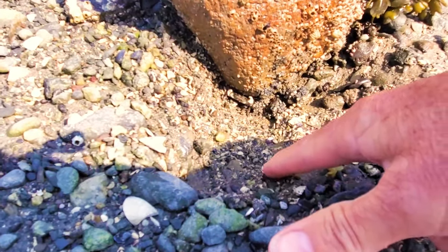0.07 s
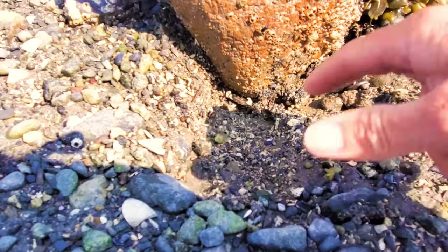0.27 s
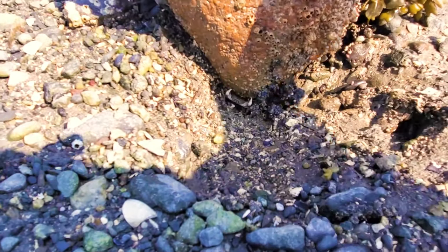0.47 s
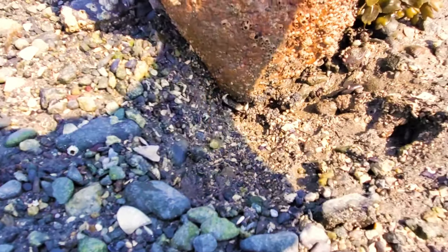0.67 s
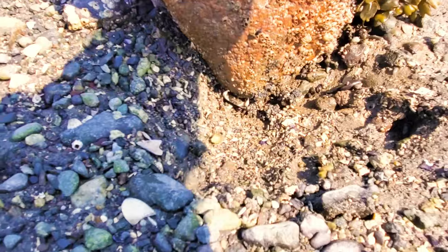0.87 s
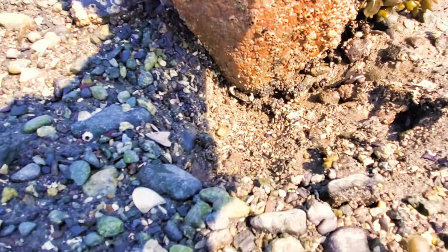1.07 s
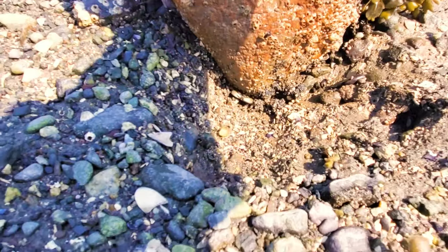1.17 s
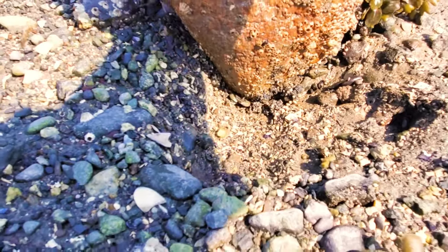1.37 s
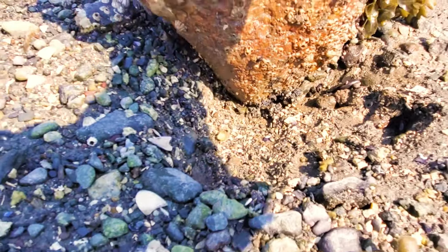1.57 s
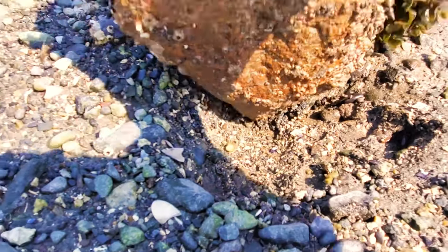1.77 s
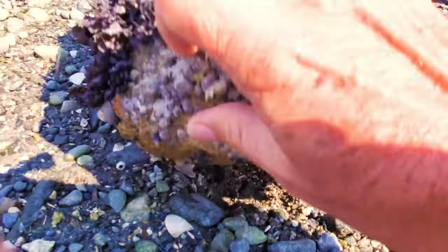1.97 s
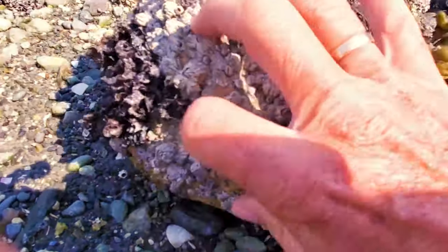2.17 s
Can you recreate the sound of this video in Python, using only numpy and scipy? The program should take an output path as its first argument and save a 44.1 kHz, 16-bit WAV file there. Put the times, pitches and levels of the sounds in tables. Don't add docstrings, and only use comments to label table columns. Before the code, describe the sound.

Gritty crunch of a stone pulled from beach gravel, shells snapping, then dull pebble knocks

```python
import sys
import numpy as np
from scipy import signal
from scipy.fft import rfft, irfft, next_fast_len
from scipy.io import wavfile
from scipy.ndimage import uniform_filter1d, map_coordinates

SR = 44100
rng = np.random.default_rng(int(sys.argv[2]) if len(sys.argv) > 2 else 0)


def materialize(psi):
    bounded = np.clip(np.atleast_2d(psi).T, -1, 1)
    quanta = np.round(bounded * 32767).astype(np.int16)
    wavfile.write(sys.argv[1], SR, quanta)


def decibels_to_gain(level_db):
    exponent = np.asarray(level_db, float) / 20
    return 10 ** exponent


N = 97549


def unit(x):
    return x / np.sqrt(np.mean(x ** 2) + 1e-20)


def along(points, hz):
    f, v = np.transpose(points)
    return np.interp(np.log(hz + 1), np.log(f + 1), v)


def curves(rows):
    s, *cols = np.transpose(rows)
    return [np.interp(np.arange(N) / SR, s, c) for c in cols]


def wobble(rate):
    knots = rng.standard_normal(int(N * rate / SR) + 4)
    return map_coordinates(knots, [np.arange(N) * rate / SR])


def filtered(x, response):
    m = next_fast_len(N + SR // 2)
    return irfft(rfft(x, m) * response(np.fft.rfftfreq(m, 1 / SR)), m)[..., :N]


def rush(gain, alike):
    def mid_side(hz):
        turn = np.arccos(np.clip(along(alike, hz), -1, 1)) / 2
        return gain(hz) * [np.cos(turn), np.sin(turn)]

    mid, side = filtered(rng.standard_normal((2, N)), mid_side)
    return unit(np.array([mid + side, mid - side]))


def patchy(pair, depth_db):
    z = signal.stft(pair, nperseg=256)[2]
    field = uniform_filter1d(rng.standard_normal(z.shape[1:]), size=4, axis=0)
    field = uniform_filter1d(field, size=8, axis=1)
    return unit(signal.istft(z * decibels_to_gain(depth_db * unit(field)), nperseg=256)[1][:, :N])


def sides(db):
    return decibels_to_gain(np.multiply.outer([.5, -.5], db))


def rings(s, hz, life_s, gains, size):
    t = np.arange(size) / SR
    wave = np.sin(2 * np.pi * np.minimum(hz, SR / 2.5)[:, None] * t) * np.exp(-t / life_s[:, None])
    at = ((s * SR).astype(int)[:, None] + np.arange(size)).ravel()
    return np.array([np.bincount(at, (g[:, None] * wave).ravel(), N + SR)[:N] for g in gains])


def grit():
    per_s, middle_hz, spread, cycles = 2200, 5120, 0.6, 0.9
    count = int(per_s * N / SR)
    u, g = rng.random((count, 2)), rng.standard_normal((count, 2))
    hz = middle_hz * np.exp(spread * g[:, 0])
    size_db = -np.log(u[:, 1] + 0.017)
    sizes = decibels_to_gain(size_db) * sides(np.clip(10 * g[:, 1], -12, 12))
    return unit(rings(u[:, 0] * N / SR, hz, cycles / hz, sizes, size=128)) * decibels_to_gain(3)


# centre in Hz, width in Hz, level in dB.
STONE_MODES = [(620, 1370, -3), (1000, 750, 3), (1900, 290, -5.5)]


def stone(weight_db):
    lumps_per_s, size_db = 300, 5

    def body(f):
        return sum((-1) ** k * decibels_to_gain(db) * 1j * f * w / (c * c - f * f + 1j * f * w)
                   for k, (c, w, db) in enumerate(STONE_MODES))

    lumps = (rng.random(N) < lumps_per_s / SR) * decibels_to_gain(size_db * np.minimum(rng.exponential(size=N), 3))
    lumps = lumps * rng.choice([-1, 1], N)
    bumps = unit(filtered(lumps, body)) * decibels_to_gain(-3.5)
    rubbed = unit(bumps + rush(body, GRIT_ALIKE)) * decibels_to_gain(weight_db)
    return filtered(rubbed, lambda f: (1j * f / (420 + 1j * f)) ** 2)


# start in seconds, effort in dB, weight of the stone in dB,
# brightness in dB, left over right in dB.
DRAG = [(0.975, -60, -15, -4, 2), (1.056, -49.5, -3, -1, 4.5), (1.192, -49, -6.5, -3, 4.5),
        (1.3, -54, -9, 1, 5), (1.43, -57.5, -7, 5.5, 4), (1.49, -52, -12, 4, 6.5),
        (1.57, -51.5, -10, 1, 5.5), (1.7, -42.5, -15.5, -1.5, 5), (1.784, -33.5, -10.5, 1.5, -1.5),
        (1.875, -31, -15, -5.5, 3.5), (1.944, -32.5, -5, -1, 8), (1.972, -41.5, 2, 6, 7),
        (2.004, -51.5, 5.5, 13.5, 11), (2.06, -32, 1, -9, 4), (2.094, -41, -4.5, -3, 9),
        (2.142, -43.5, -1.5, 0, 11.5), (2.17, -52, -4.5, 0, 5), (2.21, -44, 5.5, -1.5, 7.5)]
# start in seconds, level in dB.
SHUFFLE = [
    (0, -70.5),
    (.07, -90),
    (.3, -96),
    (.37, -72.5),
    (.46, -79),
    (.54, -92),
]
# frequency in Hz, level in dB per Hz.
SAND = [(880, -27), (1500, -9), (2200, -14), (2460, -8.5), (4280, -7), (4650, -15.5), (5250, -9),
        (9000, -32), (11700, -109), (19800, -120)]
# frequency in Hz, level in dB per Hz.
DUST = [(3500, -90), (6000, 1), (7500, -1), (12000, -1), (15800, -5)]
# frequency in Hz, likeness 0 to 1.
GRIT_ALIKE = [(500, 1), (2000, 0.77), (5000, 0.11), (12000, 0.04)]


def drag():
    effort_db, weight_db, bright_db, side_db = curves(DRAG)
    stir_db, = curves(SHUFFLE)
    before_pull_s = np.clip(DRAG[0][0] - np.arange(N) / SR, 0, 1)
    gain = decibels_to_gain(effort_db - 300 * before_pull_s) + decibels_to_gain(stir_db)
    shiver_db = 1.96 * wobble(30.23) + 0.46 * wobble(150)

    sand = patchy(rush(lambda hz: decibels_to_gain(along(SAND, hz)), GRIT_ALIKE), depth_db=0.5)
    sand = sand * decibels_to_gain(shiver_db + 2.0 * wobble(60))
    dust = patchy(rush(lambda hz: decibels_to_gain(along(DUST, hz)), GRIT_ALIKE), depth_db=1.2)
    dust = dust * decibels_to_gain(shiver_db + bright_db + 1.5 * wobble(250))
    crisp = filtered(sand + grit(), lambda f: (1j * f / (1456 + 1j * f)) ** 3)
    moved = gain * (crisp * sides(side_db) + dust * sides(0.46 * side_db) + stone(weight_db))

    dip_hz, dip_width_hz, dip_db = 1550, 180, -6
    return filtered(moved, lambda f: decibels_to_gain(dip_db * np.exp(-((f - dip_hz) / dip_width_hz) ** 2)))


def snaps(rows, ring_s, crack_db, tone_db):
    crack_s, width, late_s, tone_cycles = 0.0035, 0.28, 0.001, 31
    out, t = np.zeros((2, N + SR)), np.arange(1024) / SR
    f = np.fft.rfftfreq(2048, 1 / SR)
    for s, db, hz, side_db in rows:
        a, b, c = rng.standard_normal((3, len(t)))
        noise = np.array([a + 0.84 * b, a + 1.02 * c])
        fade = decibels_to_gain(-60 * t / ring_s) + decibels_to_gain(crack_db - 60 * t / crack_s)
        shape = fade * (1 - np.exp(-t / 0.0001))
        damping = 1j * f * hz * width * 2
        band = (damping / (hz * hz - f * f + damping)) ** 2
        burst = irfft(rfft(shape * noise, 2048) * band)[:, :len(t)]

        tone = decibels_to_gain(tone_db - 60 * t * hz / tone_cycles) * np.sin(2 * np.pi * hz * t)
        burst = burst / np.abs(burst).max() + tone * (1 - np.exp(-t / 0.00025))
        burst = burst / np.abs(burst).max() * 2
        start = round((s + late_s) * SR)
        out[:, start:start + len(t)] += decibels_to_gain(db - 4) * sides(side_db)[:, None] * burst
    return out[:, :N]


# start in seconds, peak in dB, pitch in Hz, left over right in dB.
SNAPS = [(0.0244, -40, 5400, 7.5), (0.168, -33.5, 5600, 5), (0.168, -39, 7060, 4), (0.168, -46, 9200, 6),
         (0.168, -49, 2520, 1), (0.3324, -58.5, 3600, 9), (0.4548, -45, 3230, 5.5),
         (0.4552, -45.5, 5450, -1), (0.585, -60.5, 3580, -6), (1.1092, -35.5, 2980, -2),
         (1.1672, -38, 2980, 12), (1.1872, -39, 3100, 4), (1.2, -34.5, 4300, -5), (1.3153, -32, 5100, 7),
         (1.3153, -32, 8100, 5), (1.319, -42, 11000, 3), (1.3757, -36, 3550, 5), (1.3917, -38.5, 3620, 5),
         (1.4112, -40, 3540, 8), (1.4485, -37, 7100, 0), (1.4582, -38, 6550, 3.5), (1.4834, -34, 4640, 5),
         (1.506, -31.5, 7440, 5), (1.5245, -37, 11900, 0), (1.528, -35.5, 5500, 4), (1.5375, -41, 11900, 3),
         (1.5977, -29, 7000, 7), (1.608, -32, 11100, -1), (1.6155, -36, 4500, 10), (1.669, -39, 3000, 1),
         (0.0454, -52, 9360, 6), (0.1905, -55, 6000, -3), (0.2508, -54, 10600, -3), (0.385, -52, 11500, 3),
         (1.333, -38, 7000, 4), (1.3714, -42, 13000, 0), (1.576, -32, 7000, 4.0), (1.581, -31, 10400, 7),
         (1.6383, -29, 10100, 10), (1.6563, -22.5, 13300, -7), (1.689, -25, 10900, 2),
         (1.804, -16.5, 8000, 15), (1.9954, -27, 8900, 10)]
# start in seconds, peak in dB, pitch in Hz, left over right in dB.
BREAK = [
    (1.8042, -14, 3270, 3),
    (1.8047, -15.5, 13000, 0),
    (1.8052, -12.5, 8250, 1),
]


def shells():
    return snaps([*SNAPS, *BREAK], ring_s=0.02, crack_db=7, tone_db=-3)


# start in seconds, peak in dB, pitch in Hz, left over right in dB.
CRACKS = [(1.7437, -25.5, 3130, 5), (1.744, -24, 7600, 4), (1.7657, -30, 5000, 2), (1.7675, -18, 7860, 2),
          (1.7725, -31, 7100, 2), (1.777, -20.5, 3070, 8), (1.7772, -12.5, 14200, 0),
          (1.7912, -23.5, 3820, 3), (1.8148, -15.5, 5500, 7), (1.8195, -15, 6060, -3),
          (1.828, -27, 13000, 0), (1.831, -20.5, 4500, 6), (1.8312, -24, 12400, 0), (1.8355, -12, 7000, 3),
          (1.849, -27, 3970, -3), (1.8492, -19, 11900, 0), (1.8575, -28, 3050, 0), (1.866, -22, 3930, -2),
          (1.8662, -18, 8800, 5), (1.8755, -24, 5040, 2), (1.8945, -19, 3910, -4), (1.9095, -26, 6630, 23),
          (1.9165, -19, 7400, 5)]


def cracks():
    return snaps(CRACKS, ring_s=0.011, crack_db=7, tone_db=-9)


# start in seconds, peak in dB, pitch in Hz, left over right in dB.
KNOCKS = [(1.742, -33.5, 1400, -3), (1.7768, -29.5, 760, 2), (1.7779, -23.5, 1590, -2),
          (1.8041, -19.5, 1900, 5), (1.895, -29.5, 1210, -8), (1.93, -29.5, 1000, 6),
          (1.9822, -16.5, 833, 8.5), (1.9944, -32, 900, 6), (2.011, -31, 950, 9), (2.0553, -21, 1010, -1),
          (1.982, -23, 590, 2.5), (2.0295, -30, 1000, -16), (2.034, -32.5, 1000, 21), (2.0437, -25, 620, 3),
          (2.0439, -26, 1100, -10), (2.0638, -24, 950, 8), (2.1119, -27.5, 915, 9), (2.132, -37.5, 840, 17),
          (2.196, -39, 1030, 12)]


def knocks():
    life_cycles, rise_cycles = 1.36, 0.52
    s, db, hz, side_db = np.transpose(KNOCKS)
    gains = decibels_to_gain(db + 7.5) * sides(side_db)
    full = rings(s, hz, life_cycles / hz, gains, size=1024)
    return full - rings(s, hz, rise_cycles / hz, gains, size=1024)


# middle in seconds, half length in seconds, level in dB, pitch in Hz.
RASPS = [
    (1.89, 0.028, -32, 2570),
    (1.903, 0.07, -33.5, 7700),
    (1.96, 0.041, -43.5, 3200),
    (2.059, 0.014, -31.5, 1780),
    (2.082, 0.004, -45, 1800),
    (2.071, 0.012, -35.5, 4280),
]


def rasps():
    t, width = np.arange(N) / SR, 0.12
    out = np.zeros((2, N))
    for s, half_s, db, hz in RASPS:
        swell = decibels_to_gain(db + 3.0 * wobble(300)) * np.exp(-((t - s) / half_s) ** 2)
        out += swell * rush(lambda f: 1 / (1 + ((f - hz) / (width * hz)) ** 4), GRIT_ALIKE)
    return out


# frequency in Hz, level in dB rms.
DRONE = [(97, -54), (194, -60), (291, -66.5)]


def drone():
    t, out = np.arange(N) / SR, np.zeros(N)
    for hz, db in DRONE:
        level = np.sqrt(2) * decibels_to_gain(db + 4.12 * wobble(4.115))
        out += level * np.sin(2 * np.pi * hz * t + 0.24 * wobble(3.5))
    return out


# start in seconds, level in dB.
RUMBLE = [(0.0, -32.5), (0.02, -43), (0.75, -41), (0.77, -45), (1.55, -40.5), (1.61, -36.5), (1.67, -47.5),
          (1.72, -39), (2.21, -38.5)]
# frequency in Hz, level in dB per Hz.
RUMBLE_COLOUR = [(12, -62), (22, -17), (40, -6), (66, 2), (100, -4.5), (198, -17), (295, -23), (461, -32.5),
                 (900, -37), (1170, -87), (1980, -120)]
# frequency in Hz, likeness 0 to 1.
RUMBLE_ALIKE = [(30, 0.12), (80, 0.39), (180, 1), (400, 0.97)]
# frequency in Hz, level in dB per Hz.
SHORE_COLOUR = [(290, -37), (550, -8), (800, -10), (1100, -1.5), (1450, -8), (1950, -20), (4600, -17.5),
                (9000, -23.5), (15800, -27)]


def shore():
    level_db, = curves(RUMBLE)
    rumble = rush(lambda hz: decibels_to_gain(along(RUMBLE_COLOUR, hz)), RUMBLE_ALIKE) * decibels_to_gain(level_db)
    hiss = patchy(rush(lambda hz: decibels_to_gain(along(SHORE_COLOUR, hz)), GRIT_ALIKE), depth_db=1.5)
    hiss = hiss * decibels_to_gain(-64.5 + 0.6 * wobble(40)) * sides(7.94)[:, None]

    def lag(hz):
        delay_s = 0.00045
        return np.exp(-1j * np.pi * np.multiply.outer([-1, 1], np.minimum(hz, 1200) * delay_s))

    return filtered(rumble + drone() + hiss, lag)


def scene():
    return drag() + shells() + cracks() + knocks() + rasps() + shore()


def top_cut(x):
    return signal.sosfilt(signal.butter(12, 17010, fs=SR, output="sos"), x)


def record(dry):
    mix = filtered(dry, lambda hz: np.where(hz < 15900, 1, decibels_to_gain(-37)))
    return top_cut(mix)


dry = scene()
out = record(dry)
materialize(out)
```